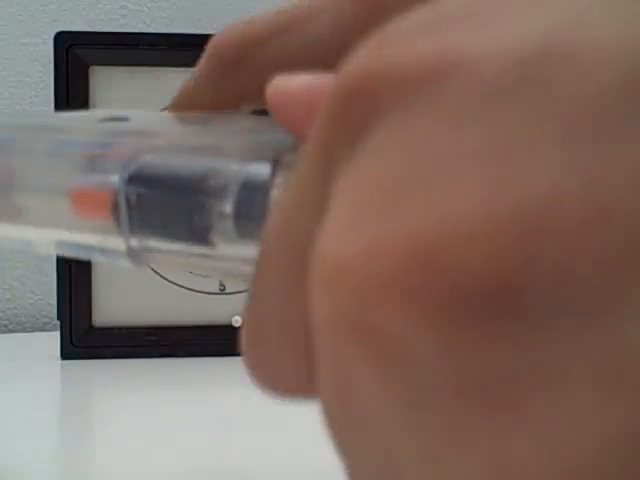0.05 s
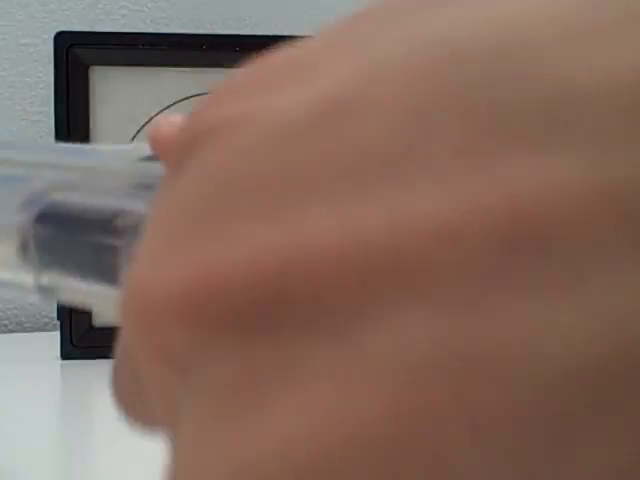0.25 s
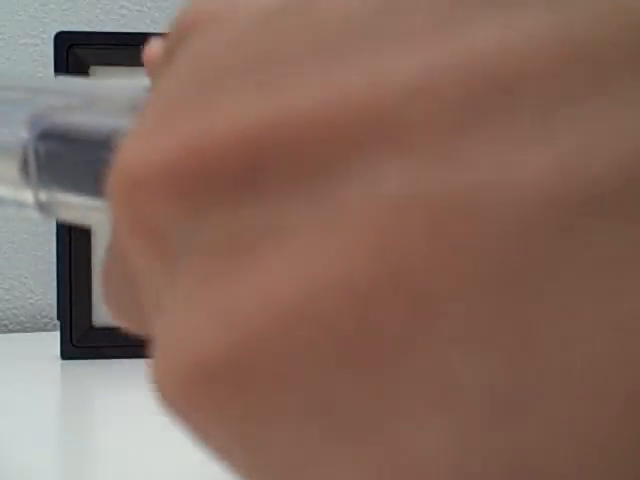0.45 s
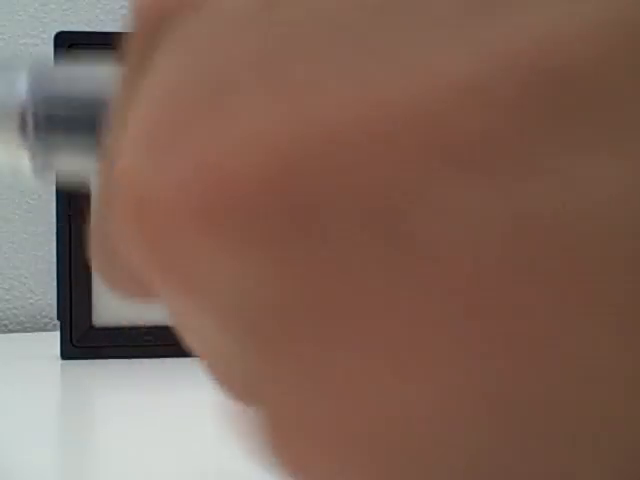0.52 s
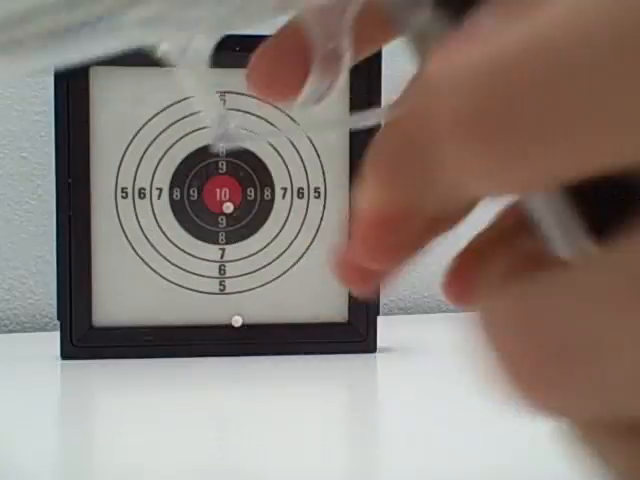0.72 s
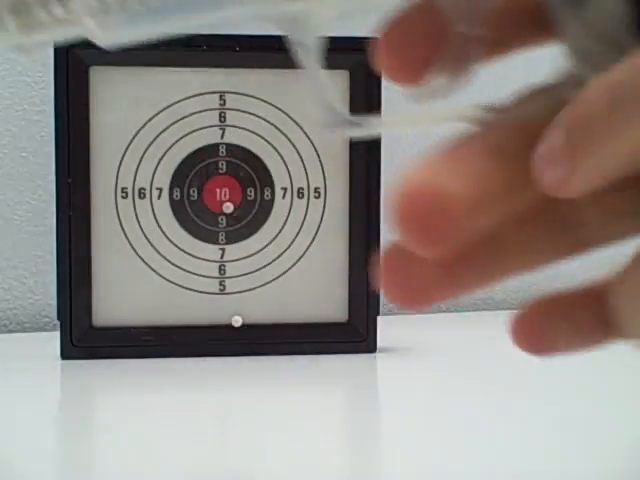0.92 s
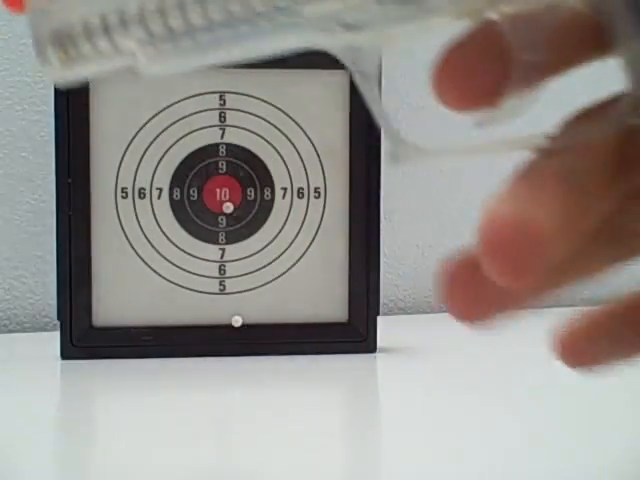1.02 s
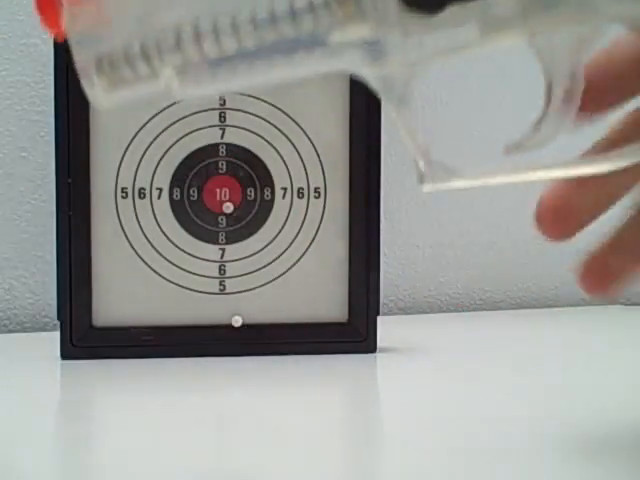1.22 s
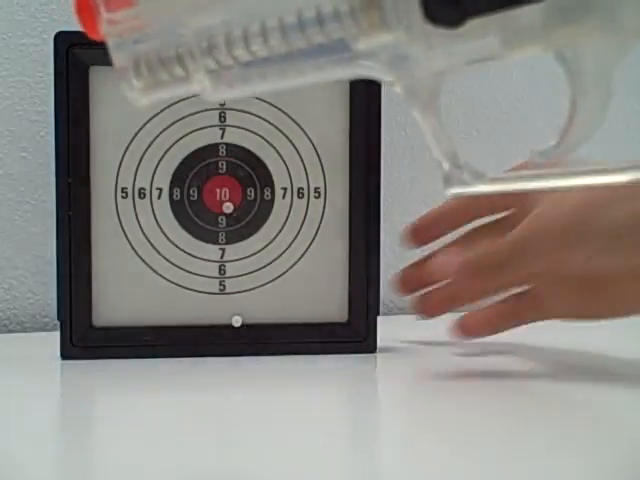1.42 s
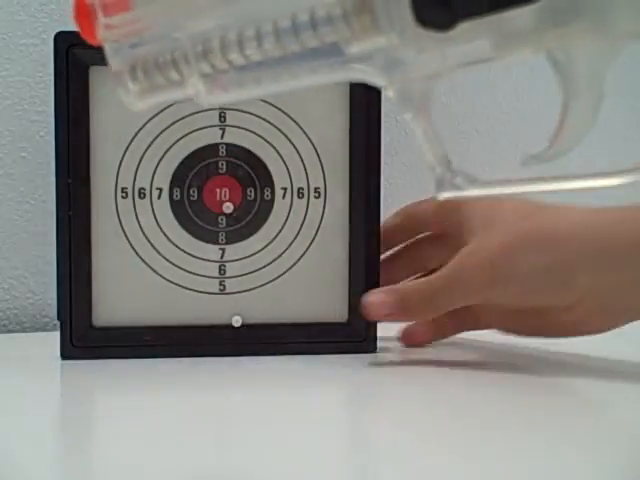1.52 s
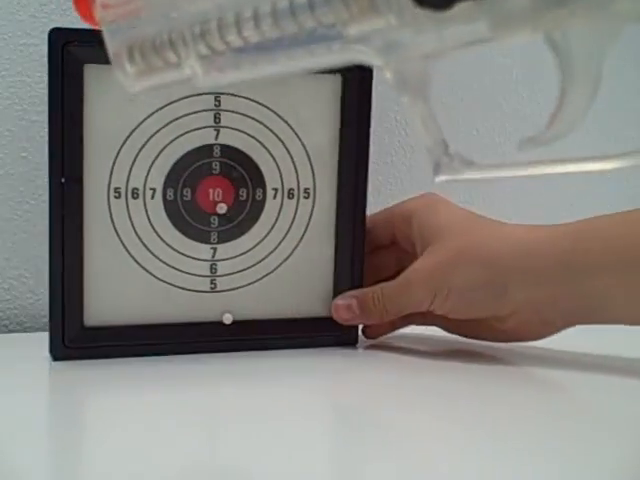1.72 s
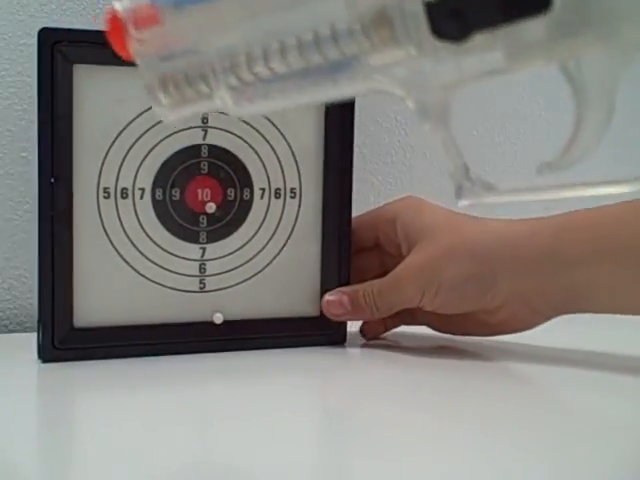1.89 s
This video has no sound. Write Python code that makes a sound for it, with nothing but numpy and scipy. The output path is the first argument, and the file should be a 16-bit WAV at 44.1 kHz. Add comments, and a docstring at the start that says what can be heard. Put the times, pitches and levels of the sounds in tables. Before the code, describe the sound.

Close up in a small quiet room with faint hum, a hollow plastic pistol slide clicks, scrapes and snaps shut hard, distorting slightly; loose clicks and soft rubs follow, then a framed target scuffs briefly across the table.

```python
"""A plastic spring pistol is racked close to the microphone in a small room with a low floor and mains hum.
Skin brushes the shell and the catch clicks; then the slide rattles forward and snaps shut, struck modes
under noisy cracks, overloading the microphone. The hands shift on the hollow shell: light clicks, damped
knocks, grainy rubs. Last, one hand nudges a framed target, whose stick-slip judders across the table."""
import sys
import numpy as np
from scipy import signal
from scipy.fft import rfft, irfft
from scipy.io import wavfile
from scipy.ndimage import uniform_filter1d

SR = 44100
rng = np.random.default_rng(int(sys.argv[2]) if len(sys.argv) > 2 else 0)


def transcribe(signal):
    """Save signal, clipped to [-1, 1], as a 16-bit WAV file at the path in sys.argv[1]."""
    frames = np.atleast_2d(signal).T
    limited = np.clip(frames, -1, 1)
    pcm = np.round(limited * 32767).astype(np.int16)
    wavfile.write(sys.argv[1], SR, pcm)


N = 85995
T = np.arange(N) / SR  # time [s]
FREQS = np.maximum(np.fft.rfftfreq(N, 1 / SR), 1)  # [Hz]

# colour of the quiet floor: (frequency [Hz], density [dB per Hz])
FLOOR_COLOUR = [(12, -32), (20, -6.5), (53, -1), (90, -10.5), (122, -9), (232, -14), (465, -14), (857, -26),
                (1820, -29), (4810, -36), (15500, -41.5)]
FLOOR_DB, HUM_HZ, HUM_DB = -56.5, 120.6, -62

# diffuse room echo: (frequency [Hz], level [dB], t60 [s])
ROOM_BANDS = [(150, -18, .3), (450, -11.5, 0.24), (800, -15, 0.21), (1190, -15.5, .32), (1610, -19, .34),
              (2500, -15.5, .33), (5070, -18.5, 0.37), (8200, -16.5, 0.28), (15000, -19, 0.35)]
ROOM_DELAY_S, ROOM_BUILD_S = 0.0066, 0.0064

# low thumps as the pistol jolts: (time [s], frequency [Hz], level [dB], t60 [s])
JOLTS = [(.075, 40.3, -37, .09), (.259, 74.2, -45, .06), (.2775, 55.47, -29.5, .055)]
# dull knocks of the hollow grip: (time [s], frequency [Hz], level [dB], t60 [s])
GRIP_KNOCKS = [(.1305, 883, -10.5, 0.01), (.1314, 1190, -11, .013), (.6270, 835, -32, 0.021),
               (.6983, 868, -17, 0.019), (.7775, 494, -25.5, 0.016), (.8880, 670, -39, 0.039),
               (.9626, 625, -29, .018), (1.0836, 584, -37.5, 0.013), (1.1785, 619, -37.5, .016)]
KNOCK_RISE_S = 0.00094

# push on the frame: (fullest at [s], rise [s], fall [s])
PUSH = (1.709, 0.011, 0.01)
# modes of frame and table: (frequency [Hz], level [dB], t60 [s])
TABLE_MODES = [(167, -18, .12), (245.4, -4.5, 0.44), (280, 3.5, 0.24), (352, -9, 0.11), (372, -9, 0.12),
               (464, 3, 0.13), (472, -6, 0.084), (610, -10, .06), (690, -9.5, 0.055), (855, -10, .05),
               (1088, -7, .035)]
# frame edge grating on the table: (fullest at [s], rise [s], fall [s], level [dB], tilt [dB/octave])
GRATES = [(1.665, 0.0013, 0.0057, -48, 0), (1.688, .009, .008, -42, 1.5), (1.71, 0.015, .015, -36, 0.5),
          (1.745, 0.017, 0.043, -46, 0), (1.9, 0.11, 0.13, -57, -5.5)]
# colour of the grating: (frequency [Hz], density [dB per Hz])
GRATE_COLOUR = [(120, -24), (260, 2), (480, 0), (800, -5), (950, -13), (1120, -4), (1650, -21.5),
                (2750, -20), (3800, -25), (4450, -19.5), (5100, -28), (5750, -24), (10000, -40),
                (16000, -41)]
SLIPS_PER_S, JUDDER_DB = 260, -34
SLIP_JITTER = 0.43  # standard deviation, in slip spacings

# skin brushing over the shell: (fullest at [s], rise [s], fall [s], level [dB], tilt [dB/octave])
RUBS = [(.0, .02, 0.057, -46, -1), (.76, .08, 0.12, -60, -3.5), (.98, 0.034, 0.023, -63.5, -3),
        (1.07, 0.0096, 0.027, -57, -4.5), (1.11, .02, 0.023, -59, -0.5), (1.142, 0.016, .018, -44.5, .5),
        (1.174, 0.0047, .006, -47.5, 0)]
# colour of the rubs: (frequency [Hz], density [dB per Hz])
RUB_COLOUR = [(80, -18), (300, -8), (600, -8.5), (1900, -10), (2450, 0), (3100, -3.5), (5200, -4),
              (6200, 2.5), (7500, -2.5), (11500, -9.5), (14600, -7.5)]
# plastic sliding on plastic: (fullest at [s], rise [s], fall [s], level [dB], tilt [dB/octave])
SCRAPES = [(0.14, 0.022, .02, -51, -2.5), (.226, 0.013, 0.052, -29.5, -1),
           (0.6124, 0.011, 0.013, -43.5, -0.5), (.567, .008, 0.0084, -58.5, 3)]
# colour of the scrapes: (frequency [Hz], density [dB per Hz])
SCRAPE_COLOUR = [(150, -10), (500, -9.5), (1300, 9.5), (2200, -1.5), (4000, -4.5), (7000, -6), (9000, -12),
                 (16000, -20)]
GRAIN_S = .002
SCRAPE_GRAIN_DB, RUB_GRAIN_DB, GRATE_GRAIN_DB = 3, 3, 4  # depth of the random level flutter

# light clicks of loose parts:
# (time [s], ring level [dB], ring pitch [ratio], crack level [dB], crack tilt [dB/octave], crack t60 [s])
CLICKS = [(.0758, -39.5, 1.02, -27.5, -2.5, 0.021), (.0808, -32, 0.99, -33, -1.5, 0.045),
          (.0905, -58, 1, -41, 0.5, 0.011), (.1322, -50.5, 1.15, -33.5, 1.5, 0.025),
          (.5928, -45, 1.12, -41, 8, 0.0084), (.6112, -43.5, 0.63, -55, 10, 0.016),
          (.6355, -66, 1, -37, 0.5, 0.008), (.6982, -38.5, 0.928, -32, -4.5, 0.035),
          (.7772, -34.5, 0.98, -32.5, 1.5, 0.0073), (.7815, -29, 0.993, -30.5, 1, 0.034),
          (.8278, -45, 1, -33.5, 0, 0.0052), (.8552, -60, 1, -59, 1, .01),
          (.8880, -39.5, 0.94, -34.5, -3.5, 0.024), (.9137, -45, 1.01, -45, -4, 0.015),
          (.9626, -34.5, 0.98, -22, -2.5, 0.0098), (1.0836, -52.5, 1, -46.5, 1, 0.014)]
# modes of the small loose parts: (frequency [Hz], level [dB], t60 [s])
PARTS_MODES = [(800, -4, .025), (1450, -1.5, 0.031), (2300, -3, .02), (2470, -1.5, 0.019),
               (3500, -5, 0.0046), (4140, -3, .011), (6600, -10.5, 0.0045)]
# their dense, fast-dying modes, heard as a crack: (frequency [Hz], density [dB per Hz])
PARTS_CRACK = [(300, -3.5), (800, -2.5), (1500, -3.5), (4000, 2.5), (5400, -3.5), (8000, -5.5),
               (11000, -14), (16000, -13.5)]

# hard contacts of the slide:
# (time [s], ring level [dB], ring pitch [ratio], crack level [dB], crack tilt [dB/octave], crack t60 [s])
SLIDE_HITS = [(.2033, -46, 1, -36.5, 0, .02), (.2062, -36.5, 1.1, -22, 2.5, .026),
              (.2354, -10, 1.04, -12, -0.5, 0.024), (.2590, -17.5, 1.1, -8, 3.5, .028),
              (.2630, -17, 0.76, -6, 3.5, .016), (.2662, -24.5, .95, -15, -0.5, 0.025),
              (.2692, -23.5, 1.04, -13, 4, .026), (.2730, -22.5, 1.3, -10.5, 3, 0.0093),
              (.2791, 2.5, 1, -6.5, 5.5, 0.011), (.2820, -10.5, 1, -14.5, -1, .014)]
# modes of slide and shell: (frequency [Hz], level [dB], t60 [s])
SHELL_MODES = [(797, -19.5, .03), (1134, -10.5, .024), (1285, -8.5, 0.028), (1530, -3.5, .02),
               (1680, -0.5, 0.02), (1867, -6.5, .022), (2184, -6, .018), (2970, -8.5, .014),
               (3385, -13, 0.028), (4200, -10.5, .01), (5130, -13, .012), (6030, -11.5, 0.017),
               (8320, -21, .015), (9980, -19, .012)]
# their dense, fast-dying modes, heard as a crack: (frequency [Hz], density [dB per Hz])
SLIDE_CRACK = [(300, -10.5), (600, -3), (1500, 3.5), (3500, 1), (6000, -0.5), (9000, -5.5), (12000, -12),
               (16000, -14)]
MODE_SPREAD_DB = 1.2  # each blow excites each mode a little differently
CONTACT_RISE_S, RADIATES_ABOVE_HZ = 0.00023, 450

OVERLOAD, OVERLOAD_KNEE = .76, 4  # ceiling [full scale], sharpness of the bend
CUTOFF_HZ = 15800


def from_db(db):
    """Decibels to gain."""
    return 10 ** (np.asarray(db) / 20)


def rms_one(x):
    """Scale to unit rms."""
    return x / np.sqrt(np.mean(x ** 2) + 1e-20)


def noise(spectrum, tilt_db=0):
    """Unit-rms noise of a given colour, tilted per octave."""
    hz, db = np.transpose(spectrum)
    colour_db = np.interp(np.log(FREQS), np.log(hz), db)
    colour_db = colour_db + tilt_db * np.log2(np.maximum(FREQS, hz[0]))
    return rms_one(irfft(rfft(rng.standard_normal(N)) * from_db(colour_db), N))


def decay(start, t60):
    """Envelope that jumps up at the start and dies away exponentially."""
    return (T >= start) * np.exp(-np.log(1000) * np.clip((T - start) / t60, 0, 10))


def attack(start, rise):
    """Rounded onset, approaching full level exponentially."""
    return 1 - np.exp(-np.maximum(T - start, 0) / rise)


def ring(start, hz, t60):
    """One struck mode, a damped sine."""
    return np.sin(2 * np.pi * hz * (T - start)) * decay(start, t60)


def swell(t, peak, rise, fall):
    """Bell-shaped stroke with its own rise and fall."""
    width = np.where(t < peak, rise, fall)
    return np.exp(-np.minimum(((t - peak) / width) ** 2 / 2, 20))


def quiet_floor():
    """Steady coloured noise with mains hum, a single sine."""
    hum = rms_one(np.sin(2 * np.pi * HUM_HZ * T))
    return from_db(FLOOR_DB) * noise(FLOOR_COLOUR) + from_db(HUM_DB) * hum


def room(x):
    """Diffuse echo that arrives late, builds up quickly and dies band by band."""
    white = rfft(rng.standard_normal(N))
    log_hz = np.log([row[0] for row in ROOM_BANDS])
    echo = np.zeros(N)
    # each share is one at its own band and zero at the others, so neighbours crossfade
    for share, (hz, db, t60) in zip(np.eye(len(ROOM_BANDS)), ROOM_BANDS):
        envelope = decay(ROOM_DELAY_S, t60) * attack(ROOM_DELAY_S, ROOM_BUILD_S)
        band = irfft(white * np.interp(np.log(FREQS), log_hz, share), N)
        echo += from_db(db) * band * envelope / np.linalg.norm(envelope)
    return signal.fftconvolve(x, echo)[:N]


def soft_blows(rows):
    """Thumps and knocks, each one damped mode with a rounded attack."""
    out = np.zeros(N)
    for start, hz, db, t60 in rows:
        out += from_db(db) * ring(start, hz, t60) * attack(start, KNOCK_RISE_S)
    return out


def friction(strokes, spectrum, grain_db):
    """Surfaces rubbing: coloured hiss with a random grain, swelling under each stroke."""
    out = np.zeros(N)
    for peak, rise, fall, db, tilt_db in strokes:
        smoothed = uniform_filter1d(rng.standard_normal(N), max(1, int(GRAIN_S * SR)))
        grain = from_db(grain_db * rms_one(smoothed))
        hiss = rms_one(noise(spectrum, tilt_db) * grain)
        out += from_db(db) * swell(T, peak, rise, fall) * hiss
    return out


def frame_push():
    """The frame sticks and slips unevenly; every slip drives the modes of frame and table."""
    count = 1000  # enough slips to span the whole scene
    spacings = np.arange(count) - count / 2 + SLIP_JITTER * rng.standard_normal(count)
    slips = spacings / SLIPS_PER_S + PUSH[0]
    slips = slips[(slips > 0) & (slips < T[-1])]
    force = np.bincount((slips * SR).astype(int), swell(slips, *PUSH), N)
    body = np.zeros(N)
    for hz, db, t60 in TABLE_MODES:
        body += from_db(db) * rms_one(signal.fftconvolve(force, ring(0, hz, t60))[:N])
    # rms is taken over the whole scene, so scale by the push's share of it
    judder = from_db(JUDDER_DB) * body * np.sqrt(PUSH[1] / T[-1])
    return judder + friction(GRATES, GRATE_COLOUR, GRATE_GRAIN_DB)


def contacts(rows, modes, crack):
    """Each contact gives a noisy crack and sets the modes ringing; the small body radiates little bass."""
    out = np.zeros(N)
    for start, ring_db, pitch, crack_db, tilt_db, t60 in rows:
        hit = from_db(crack_db) * noise(crack, tilt_db) * decay(start, t60)
        for k, (hz, db, mode_t60) in enumerate(modes):
            level_db = ring_db + db + MODE_SPREAD_DB * rng.standard_normal()
            # alternate modes start with opposite sign
            hit += (-1) ** k * from_db(level_db) * ring(start, hz * pitch, mode_t60)
        out += hit * attack(start, CONTACT_RISE_S)
    high_pass = signal.butter(3, RADIATES_ABOVE_HZ, "high", fs=SR, output="sos")
    return signal.sosfilt(high_pass, out)


def pistol():
    """Slide, loose parts and hollow grip, struck, with plastic scraping and skin rubbing."""
    slide = contacts(SLIDE_HITS, SHELL_MODES, SLIDE_CRACK)
    slide += friction(SCRAPES, SCRAPE_COLOUR, SCRAPE_GRAIN_DB)
    loose_parts = contacts(CLICKS, PARTS_MODES, PARTS_CRACK)
    hands = soft_blows(GRIP_KNOCKS) + friction(RUBS, RUB_COLOUR, RUB_GRAIN_DB)
    return slide + loose_parts + hands


def scene():
    """Pistol, hands and frame with their room echo; the jolts and the floor carry no echo."""
    direct = frame_push() + pistol()
    return (quiet_floor() + room(direct) + soft_blows(JOLTS) + direct)[None]


def record(dry):
    """The snap overloads the microphone, which bends smoothly to a ceiling; the top is cut."""
    clipped = dry / (1 + np.abs(dry / OVERLOAD) ** OVERLOAD_KNEE) ** (1 / OVERLOAD_KNEE)
    low_pass = signal.ellip(10, .2, 70, CUTOFF_HZ, fs=SR, output="sos")
    return signal.sosfilt(low_pass, clipped)


dry = scene()
out = record(dry)
transcribe(out)
```